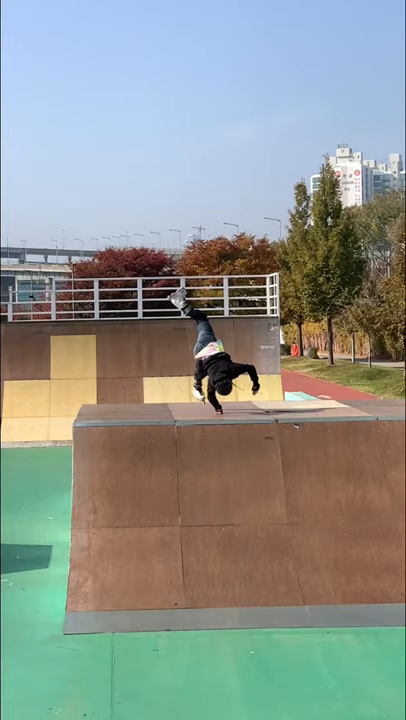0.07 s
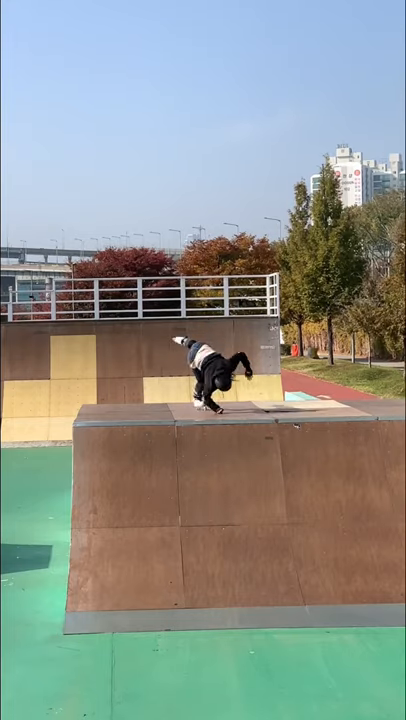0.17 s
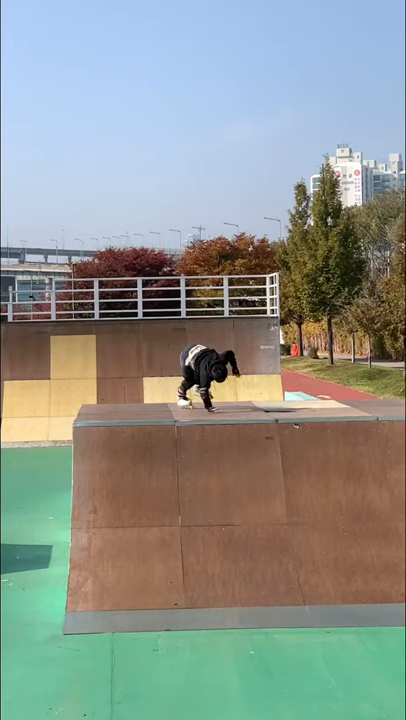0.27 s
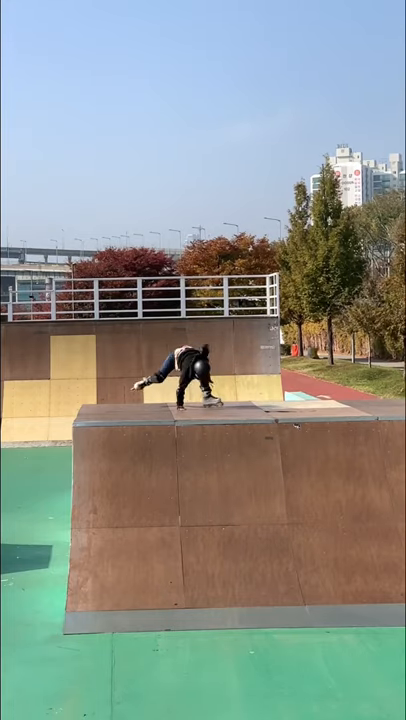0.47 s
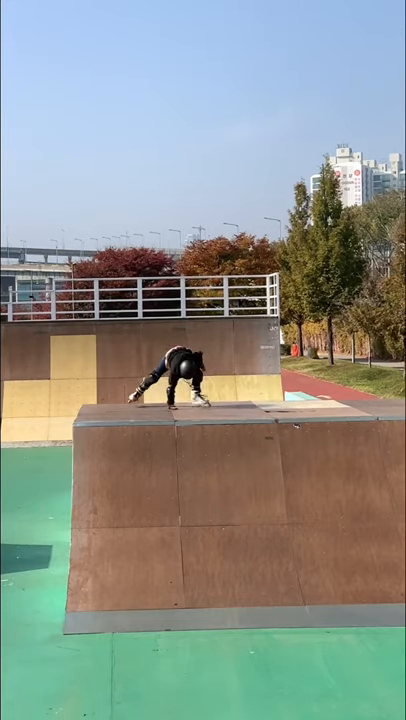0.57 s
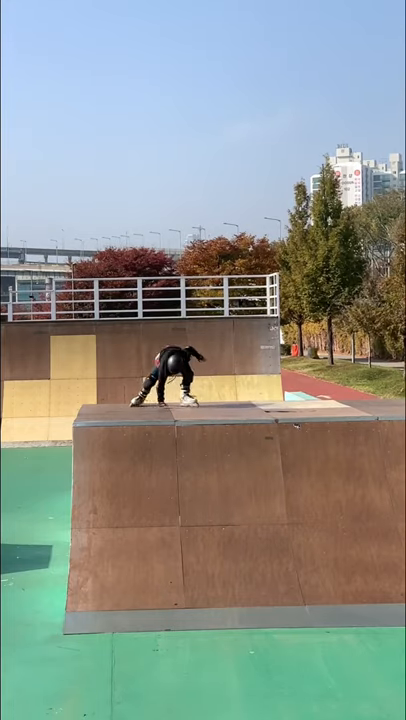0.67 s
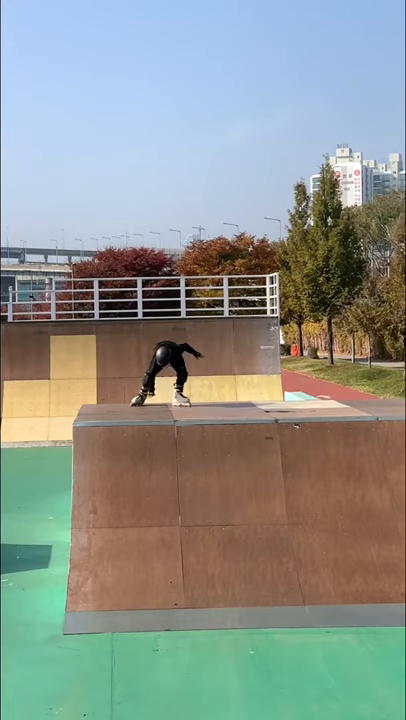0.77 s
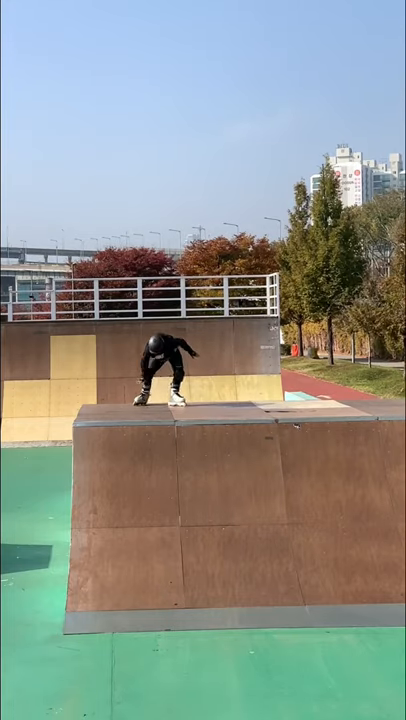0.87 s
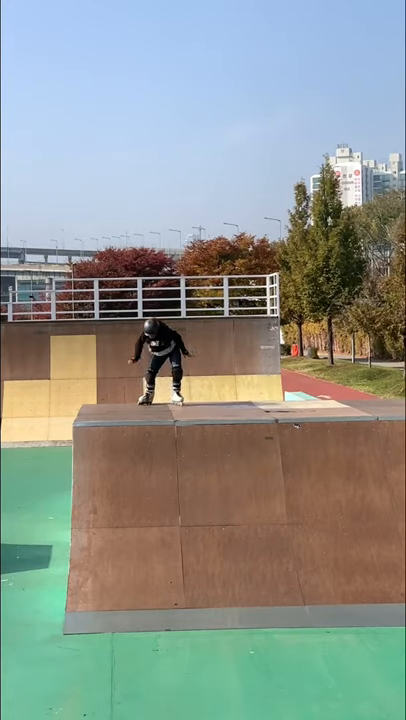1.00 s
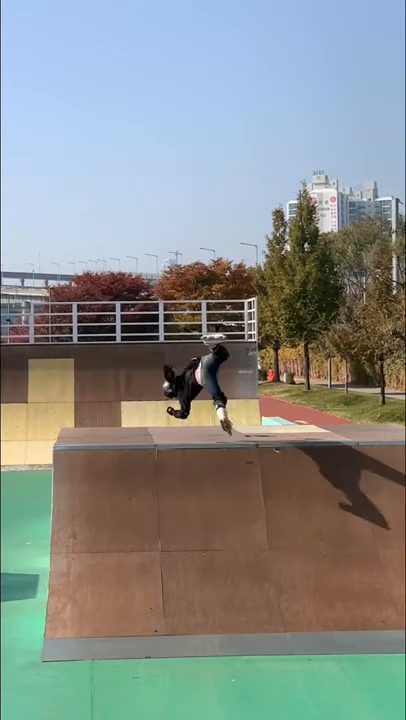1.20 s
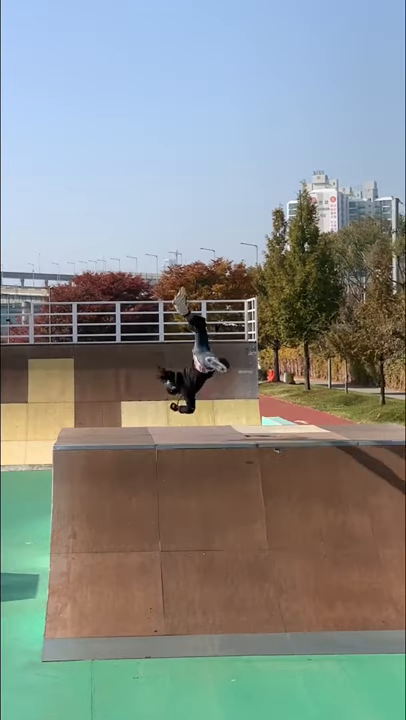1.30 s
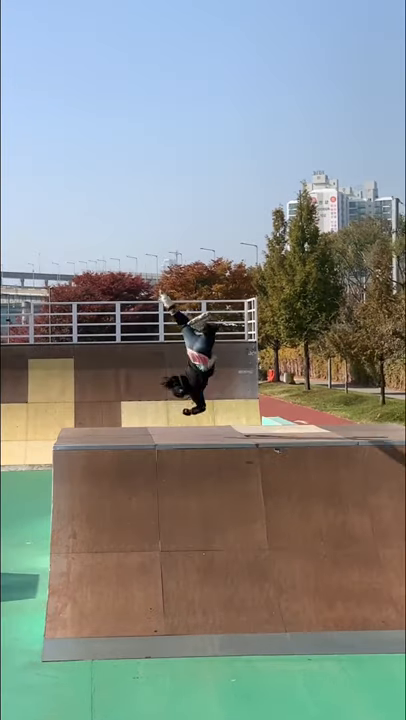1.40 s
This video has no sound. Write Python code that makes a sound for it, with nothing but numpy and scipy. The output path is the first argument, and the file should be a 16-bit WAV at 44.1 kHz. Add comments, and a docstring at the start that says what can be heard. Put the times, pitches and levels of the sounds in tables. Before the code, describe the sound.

An inline skater lands on a hollow ramp deck a few metres away with a booming thud and crack. Two lighter knocks follow, then wheels rumble and scrape, fading outdoors over distant traffic and small close clicks.

```python
"""Wheels hiss and scrape briefly over distant road traffic in an outdoor park. At 0.15 s an inline skater
lands from a flip on the hollow deck of a ramp, a few metres away: the impact excites the modes of boards
and skate frames, the hard boots crack, and the weight makes the box boom. More blows follow near 0.37 s
and 0.66 s, each echoed by the other ramps. The wheels then rumble and scrape on over the deck and fade.
Small sharp clicks sound close by, and the level dips briefly near 1.07 s."""
import sys
import numpy as np
from scipy import signal
from scipy.fft import rfft, irfft
from scipy.io import wavfile
from scipy.ndimage import uniform_filter1d

SR = 44100
rng = np.random.default_rng(int(sys.argv[2]) if len(sys.argv) > 2 else 0)


def dump(signal):
    """Clip the signal to [-1, 1] and save it as 16-bit WAV at the path in sys.argv[1]."""
    limited = np.clip(np.atleast_2d(signal).T, -1, 1)
    pcm = np.round(limited * 32767).astype(np.int16)
    wavfile.write(sys.argv[1], SR, pcm)


N = 63945
FREQS_HZ = np.fft.rfftfreq(N, 1 / SR)


def amp(db):
    """Amplitude ratio of a level in decibels."""
    return 10 ** (np.asarray(db) / 20)


def clock(start_s=0):
    """Seconds since the start, zero before it."""
    return np.maximum(np.arange(N) / SR - start_s, 0)


def envelope(points):
    """Gain over time from (time_s, level_db) points."""
    return amp(np.interp(clock(), *np.array(points).T))


def spectral_gain(points):
    """Gain over frequency from (frequency_hz, level_db) points."""
    hz, db = np.array(points).T
    return amp(np.interp(np.log(FREQS_HZ + 1), np.log(hz), db))


# stereo width of near and diffuse sound, side relative to mid: frequency_hz, side_db
NEAR_WIDTH = [(100, -29), (700, -14.5), (1400, -27), (2400, 2.5), (4400, -7), (8000, -4), (15000, -1.5)]
DIFFUSE_WIDTH = [(60, -13), (130, -21), (300, -10.5), (700, -0.5), (1300, -9.5), (2400, 0), (8000, -1.5)]
def noise(spectrum, width):
    """Partly coherent stereo noise of rms 1: the sum and difference of independent mid and side."""
    mid, side = rfft(rng.standard_normal((2, N))) * spectral_gain(spectrum)
    side_gain = spectral_gain(width)
    side = side * side_gain
    stereo = irfft(np.array([mid + side, mid - side]) / np.sqrt(1 + side_gain ** 2), N)
    return stereo / stereo.std()


def steady(x):
    """Division by the running rms evens out slow swells."""
    return x / np.sqrt(uniform_filter1d((x ** 2).mean(0), size=SR // 14))


def ring(modes, start_s=0):
    """Free vibration: a sum of damped modes of alternating sign, each slightly detuned."""
    t = clock(start_s)
    detune = 1 + 0.0045 * rng.standard_normal(len(modes))
    return sum((-1) ** k * amp(db - 60 * t / t60_s) * np.sin(2 * np.pi * hz * detune[k] * t)
               for k, (hz, db, t60_s) in enumerate(modes))


def burst(start_s, decay_s):
    """Exponential decay after an instant attack."""
    t = clock(start_s)
    return (t > 0) * np.exp(-t / decay_s)


def convolve(x, response):
    """A linear system's output: the input convolved with its impulse response."""
    return signal.fftconvolve(np.atleast_2d(x), np.atleast_2d(response), axes=1)[:, :N]


# distant road noise: frequency_hz, level_db
TRAFFIC_SPECTRUM = [(25, -14), (60, 21.5), (130, -9), (280, 2.5), (500, 0.5), (900, 3), (1400, -1),
                    (1900, -8), (2700, -19), (4000, -25.5), (5200, -32.5), (8000, -40.5), (10000, -56),
                    (15000, -48)]
def traffic(level_db=-38.5):
    """Incoherent addition: distant vehicles merge into one steady noise."""
    return amp(level_db) * noise(TRAFFIC_SPECTRUM, DIFFUSE_WIDTH)


# sound reflected by the ramps: frequency_hz, level_db
ECHO_SPECTRUM = [(60, -22), (230, -2), (520, 6), (680, 2.5), (900, 6), (1500, 1), (2500, 7), (4000, 3),
                 (6500, 6), (8300, 6.5), (14000, 0.5)]
def ramp_echoes(x, gain_db=-6.5, delay_s=0.0089, t60_s=0.68):
    """Reverberation: reflections scattered by the ramps all round form a decaying tail."""
    tail = noise(ECHO_SPECTRUM, DIFFUSE_WIDTH) * burst(delay_s, t60_s / np.log(1000))
    energy_per_channel = (tail ** 2).sum() / 2
    return amp(gain_db) * convolve(x.mean(0), tail / np.sqrt(energy_per_channel))


# small sharp clicks close by, some probably handling noise: start_s, snap_db, decay_s, pitch_hz, ring_db
SMALL_CLICKS = [(0.577, -46.5, 0.0024, 6550, -64.5), (0.867, -50, 0.0013, 7000, -44),
                (1.085, -41, 0.0015, 4130, -39), (1.112, -61, .006, 4370, -53),
                (1.144, -50.5, 0.0077, 4450, -42.5), (1.233, -55, .001, 6400, -49),
                (1.416, -60, .001, 7300, -58)]
# the snap of a click: frequency_hz, level_db
SNAP_SPECTRUM = [(1000, -20), (2500, -3.5), (4200, 3.5), (5300, -6), (6800, 0), (8800, -1.5), (10200, -17),
                 (13000, -3), (15500, -24)]
def small_clicks(t60_s=0.0068):
    """Transients: each click is a snap of noise and one heavily damped mode."""
    snap = noise(SNAP_SPECTRUM, NEAR_WIDTH)
    return sum(amp(snap_db) * burst(start_s, decay_s) * snap + ring([(hz, ring_db, t60_s)], start_s)
               for start_s, snap_db, decay_s, hz, ring_db in SMALL_CLICKS)


# scrapes of wheels and frames: start_s, length_s, pitch_hz, level_db, half_width_ratio
SCRAPES = [(0, 0.057, 4530, -44, 0.067), (0.664, 0.029, 4250, -42, 0.12), (0.94, 0.14, 6200, -67, .03),
           (1.213, 0.079, 3820, -60.5, 0.044), (1.338, 0.023, 3270, -62, .03),
           (1.368, .035, 3800, -59, .06), (1.385, 0.086, 3410, -62, 0.019)]
def scrapes():
    """Rough friction excites one high resonance of the skate, which swells and fades."""
    sound = 0
    for start_s, length_s, pitch_hz, level_db, half_width_ratio in SCRAPES:
        detune = (FREQS_HZ / pitch_hz - 1) / half_width_ratio
        rub = irfft(rfft(rng.standard_normal(N)) / (1 + detune ** 2), N)
        swell = np.sin(np.pi * np.minimum(clock(start_s) / length_s, 1))
        sound += amp(level_db) * swell * rub / (rub.std() * np.sqrt(2))
    return sound


# deck rumble, deep box drone, higher deck hum and wheel hiss: frequency_hz, level_db
RUMBLE_SPECTRUM = [(20, -56.5), (32, -9.5), (46, 4.5), (70, -4.5), (100, -4), (135, -8.5), (180, -11),
                   (240, -12), (330, -18), (500, -26.5), (800, -30), (2000, -35), (6000, -99)]
DRONE_SPECTRUM = [(35, -41), (52, 6.5), (66, 6), (77, 0), (95, -13), (300, -80.5)]
HUM_SPECTRUM = [(40, -62), (68, -15.5), (84, 9.5), (98, 7), (115, 1), (150, -18), (400, -81)]
HISS_SPECTRUM = [(500, 9.5), (1500, -2), (2600, 0), (4300, -2.5), (5300, -10), (6500, -9.5), (8500, -22),
                 (10000, -39), (12500, -32), (15000, -46)]
# the course of the same four sounds: time_s, level_db
RUMBLE_LEVELS = [(0, -26.5), (.14, -31), (.25, -18.5), (.40, -26), (.52, -24), (.62, -29.5), (.80, -27.5),
                 (.90, -32.5), (1.05, -30.5), (1.12, -35.5), (1.19, -33.5), (1.3, -34), (1.45, -40.5)]
DRONE_LEVELS = [(0, -29.5), (.12, -39), (.35, -42), (.43, -27), (.50, -26), (.57, -26), (.68, -27),
                (.75, -35), (.81, -22.5), (.87, -35.5), (1.12, -36), (1.18, -24), (1.23, -40), (1.3, -33),
                (1.45, -43)]
HUM_LEVELS = [(0, -52), (.22, -38), (.28, -20.5), (.35, -27.5), (.44, -26.5), (.53, -26.5), (.6, -49),
              (.68, -34), (.74, -22), (.87, -29.5), (1.0, -29.5), (1.1, -37), (1.22, -39.5), (1.28, -28.5),
              (1.36, -47), (1.45, -61)]
HISS_LEVELS = [(0, -32), (.035, -36.5), (.05, -43.5), (.13, -45), (.3, -52.5), (.45, -41.5), (.6, -47.5),
               (.8, -53.5), (1.0, -61.5), (1.1, -55.5), (1.45, -85)]
def rolling():
    """Forced vibration: the wheels drive the deck and hollow box, and hiss on the ramp's skin."""
    rumble = steady(noise(RUMBLE_SPECTRUM, DIFFUSE_WIDTH)) * envelope(RUMBLE_LEVELS)
    drone = steady(noise(DRONE_SPECTRUM, NEAR_WIDTH)) * envelope(DRONE_LEVELS)
    hum = steady(noise(HUM_SPECTRUM, NEAR_WIDTH)) * envelope(HUM_LEVELS)
    hiss = noise(HISS_SPECTRUM, DIFFUSE_WIDTH) * envelope(HISS_LEVELS)
    return rumble + drone + hum + hiss


# lag of the right channel for sound from the deck: frequency_hz, lag_rad
ARRIVAL_LAG = [(0, 0), (1600, .3), (2400, 1.5), (4200, 1.8), (5000, 3.6), (6600, 6.0), (8400, 7.8),
               (11900, 12.3), (15000, 14)]
def direct_path(x):
    """Phase delay: direct sound reaches the left and right receivers out of step."""
    lag_rad = np.interp(FREQS_HZ, *np.array(ARRIVAL_LAG).T)
    return np.array([x[0], irfft(rfft(x[1]) * np.exp(-1j * lag_rad), N)])


# the skater's weight sinking into the deck: start_s, level_db, pitch_hz, length_s
WEIGHT_PULSES = [(0.154, -5.5, 150, 0.028), (0.168, -1, 117, 0.022), (0.205, -10, 114, 0.025),
                 (0.37, -11.5, 167.6, 0.01746), (0.38, -8, 63.5, 0.0454), (0.388, -13.5, 148, 0.0232),
                 (0.468, -18, 65.5, .06), (0.661, -21, 64, 0.036), (0.702, -17.5, 97, 0.0288)]
# resonances of the hollow box: pitch_hz, level_db, t60_s
BOX_MODES = [(53, -3.5, .2), (60, 0, 0.15), (89, -15, 0.38), (109.6, -9, 0.14), (157, 3.5, 0.094),
             (223.6, 10, 0.14), (268, -9, 0.17)]
# shuddering panels: frequency_hz, level_db
SHUDDER_SPECTRUM = [(100, -13), (220, 9), (310, -10), (420, -5), (550, 2.5), (660, -21), (1200, -18),
                    (4000, -27.5), (12000, -73)]
def deck_thuds(resonance_gain_db=7, shudder_db=-14):
    """Elastic rebound: the deck gives and springs back, so the box resonates and its panels shudder."""
    push = 0
    for start_s, level_db, pitch_hz, length_s in WEIGHT_PULSES:
        t = clock(start_s)
        window = np.sin(np.pi * np.minimum(t / length_s, 1)) ** 2
        push += amp(level_db) * window * np.sin(2 * np.pi * pitch_hz * (t - length_s / 2))
    box = ring(BOX_MODES)
    boom = convolve(push, box / np.abs(rfft(box)).max())
    shudder = np.abs(push) * noise(SHUDDER_SPECTRUM, NEAR_WIDTH)
    return push + amp(resonance_gain_db) * boom + amp(shudder_db) * shudder


def hollow_deck(x, centre_hz=636, q=3.3):
    """Antiresonance: the deck swallows one band between its low and high resonances."""
    return signal.lfilter(*signal.iirnotch(centre_hz, q, fs=SR), x)


# skates striking the deck: start_s, knock_db, crack_db, clink_db, crack_decay_s, clack_hz, clack_db
SKATE_BLOWS = [(0.1525, -14, -17.5, -45, 0.0094, 1440, -24),
               (0.1668, -11.5, -19.5, -27.5, 0.022, 1200, -26),
               (0.370, -35.5, -24.5, -39.5, 0.014, 1544, -19.5),
               (0.3722, -25.5, -33, -61, 0.003, 874, -18.5), (0.380, -23, -28.5, -36, 0.02, 1610, -28),
               (0.394, -27, -30.5, -51, 0.0095, 1060, -31.5), (0.6635, -35.5, -30, -43, 0.015, 860, -26),
               (0.6665, -21, -32, -40.5, 0.0063, 1370, -19)]
# resonances of the deck boards and the skate frames: pitch_hz, level_db, t60_s
BOARD_MODES = [(352, -13.5, 0.04), (430, -6.5, 0.06), (474, -6.5, 0.074), (529, -9, 0.076),
               (585, -16, 0.075), (804, -12, 0.058), (858, -11.5, 0.027), (950, -13, 0.066),
               (1086, -19, 0.038), (1280, -12.5, 0.056), (1490, -20.5, .04), (1923, -12.5, 0.066)]
FRAME_MODES = [(3240, -7, 0.037), (3310, -5, 0.13), (4280, -22, 0.076), (6500, 3, 0.026),
               (6800, 2.5, 0.012), (7070, -24, 0.01), (8530, -0.5, 0.013)]
# crack of the hard plastic boots: frequency_hz, level_db
CRACK_SPECTRUM = [(150, 13.5), (310, -5), (420, 11), (560, 9), (660, -2.5), (800, 6.5), (1900, 3),
                  (2600, -7), (3600, -1.5), (5200, -11), (6700, -6), (8600, -14), (10000, -33.5),
                  (12500, -15), (15500, -57)]
def skate_blows(clack_t60_s=0.026):
    """Impulsive excitation: each blow makes the boards knock, the frame clink, the boot clack and crack."""
    knocks, clinks, crack_envelope = 0, 0, 0
    for start_s, knock_db, crack_db, clink_db, crack_decay_s, clack_hz, clack_db in SKATE_BLOWS:
        boards = amp(knock_db) * ring(BOARD_MODES, start_s)
        boot_clack = ring([(clack_hz, clack_db, clack_t60_s)], start_s)
        knocks += boards + boot_clack
        clinks += amp(clink_db) * ring(FRAME_MODES, start_s)
        crack_envelope += amp(crack_db) * burst(start_s, crack_decay_s)
    return hollow_deck(knocks), clinks, crack_envelope * noise(CRACK_SPECTRUM, NEAR_WIDTH)


def scene(knock_echo_db=-9, left_minus_right_db=-0.3):
    """Superposition of all sources; only cracks, clicks and, more weakly, knocks echo."""
    knocks, clinks, cracks = skate_blows()
    clicks = small_clicks()
    echoes = ramp_echoes(cracks + clicks + amp(knock_echo_db) * knocks)
    landing = direct_path(knocks + clinks + cracks + deck_thuds())
    skater = landing + rolling() + scrapes()
    balance = amp(left_minus_right_db / 2 * np.array([[1], [-1]]))
    return (traffic() + echoes + clicks + skater) * balance


def record(dry):
    """Band limiting removes the deepest bass and the top; the level dips briefly once."""
    low_cut_hz, high_cut_hz = 54.6, 15900
    dip_s, dip_db, recovery_s = 1.067, -17.5, 0.019
    dip = envelope([(dip_s - .001, 0), (dip_s + .001, dip_db), (dip_s + recovery_s, 0)])
    highpass = signal.butter(2, low_cut_hz, "high", fs=SR, output="sos")
    lowpass = signal.ellip(8, .2, 70, high_cut_hz, fs=SR, output="sos")
    return signal.sosfilt(lowpass, signal.sosfilt(highpass, dry) * dip)


dry = scene()
out = record(dry)
dump(out)
```